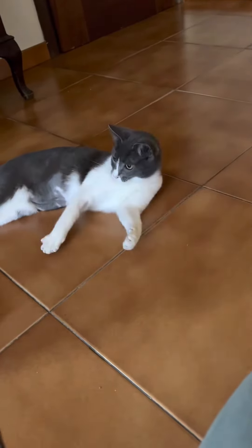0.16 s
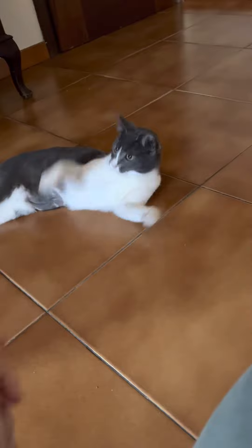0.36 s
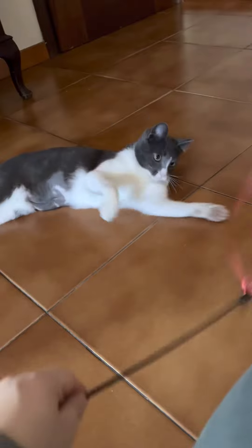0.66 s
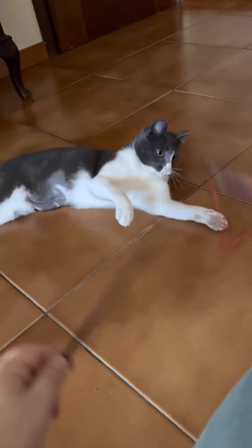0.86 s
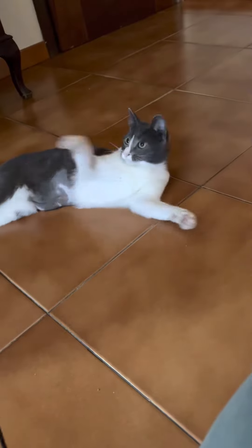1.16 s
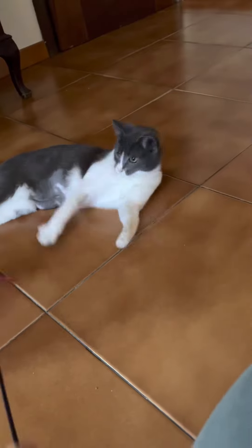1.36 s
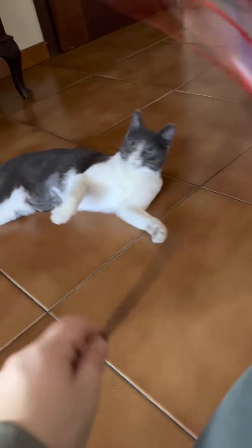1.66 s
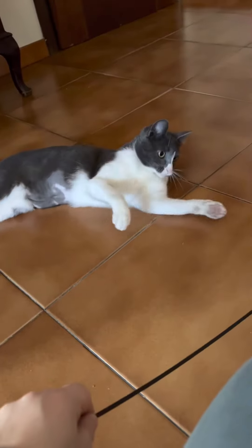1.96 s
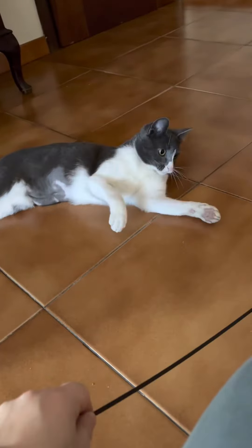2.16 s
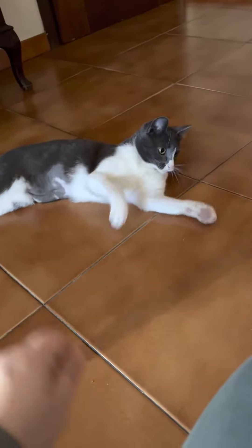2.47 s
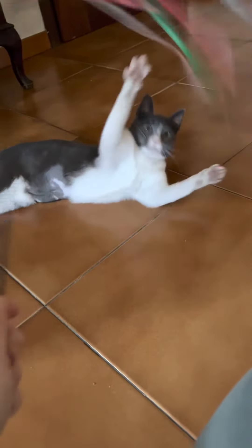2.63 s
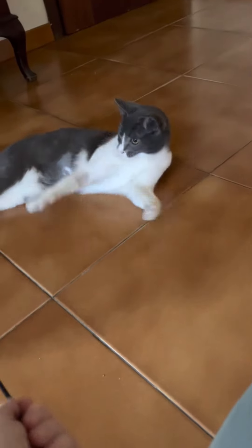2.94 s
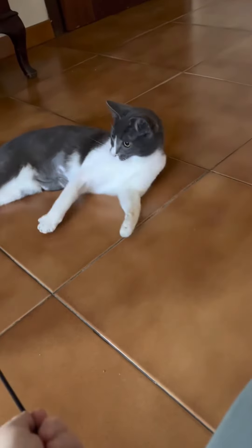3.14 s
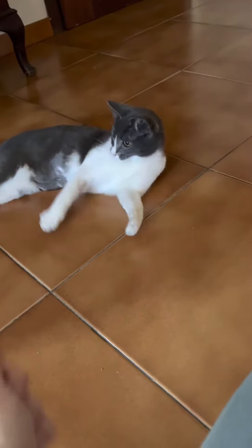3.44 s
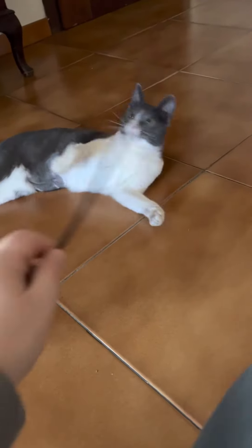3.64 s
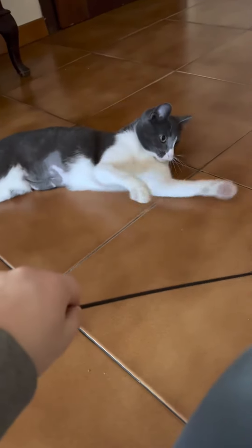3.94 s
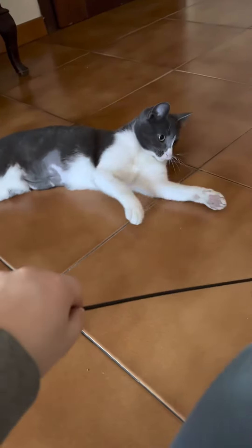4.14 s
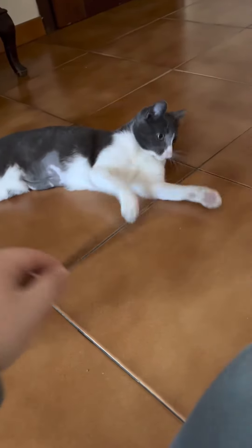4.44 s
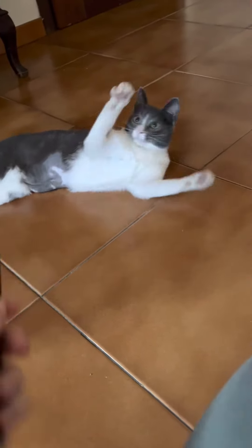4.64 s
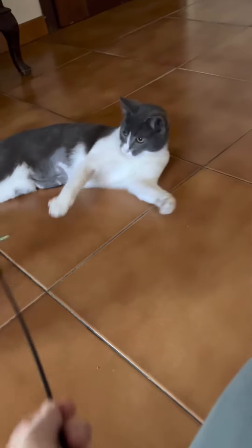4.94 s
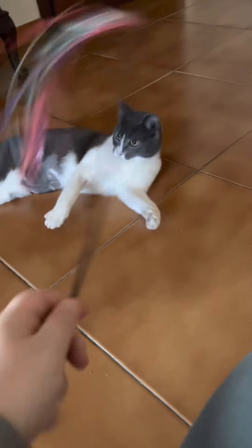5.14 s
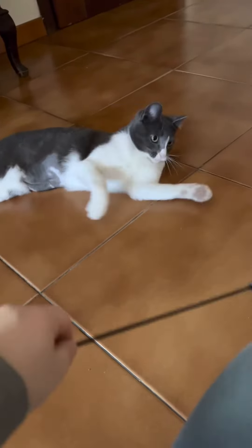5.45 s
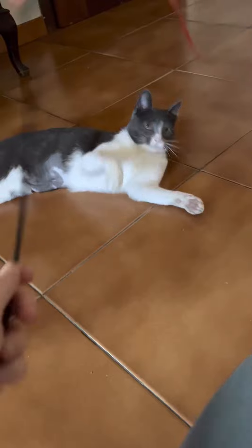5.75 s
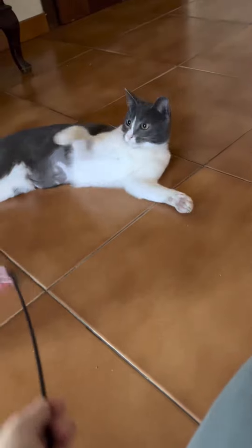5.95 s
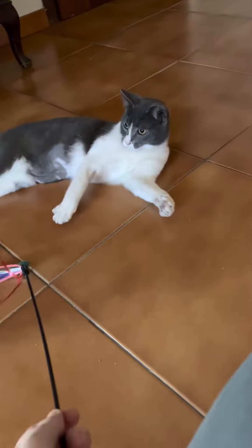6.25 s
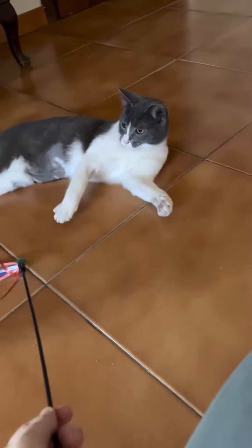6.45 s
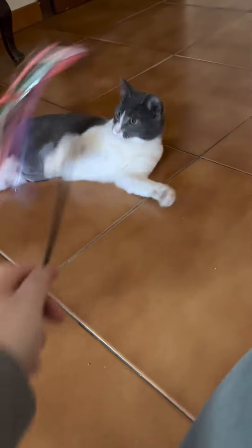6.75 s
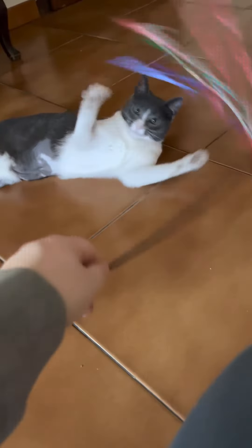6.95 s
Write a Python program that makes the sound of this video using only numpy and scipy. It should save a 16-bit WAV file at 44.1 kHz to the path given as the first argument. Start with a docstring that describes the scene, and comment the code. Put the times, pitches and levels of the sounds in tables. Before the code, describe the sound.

Faint bassy house hum runs throughout. Over it, thin foil strips swish and crackle in irregular bursts, first light, then hard cracks just after one second, a knock before two, more flurries around three and four, and the strongest slaps between five and six. A quiet gap follows, then a last swish and tap. Handheld phone close by, stereo, with slight low handling bumps and lively room echo.

```python
"""A house hums, drones and hisses faintly; then foil ribbons on a wand swish and crinkle, snap and slap on tiles.
Foil is dense random flips in two voices; snaps are short swelling ticks with a rattle; slaps are crinkle bursts.
The wand tip knocks: a falling sweep plus decaying modes. Sleeve brushes and low wand whooshes are band noise;
the hand bumps in low sines. Noise tails ring as a hard room; two close ports differ in phase and strength."""
import sys
import numpy as np
from scipy import signal
from scipy.fft import rfft, irfft, next_fast_len
from scipy.io import wavfile

SR = 44100
rng = np.random.default_rng(int(sys.argv[2]) if len(sys.argv) > 2 else 0)


def digitize_waveform(pressure):
    """Quantize a signal to 16-bit integers and store it at the path in sys.argv[1].

    Rows of a 2-D input are taken as channels; values are limited to [-1, 1].
    """
    field = np.atleast_2d(pressure).T
    bounded = np.clip(field, -1, 1)
    quanta = np.round(bounded * 32767).astype(np.int16)
    wavfile.write(sys.argv[1], SR, quanta)


N = 313110
SIZE = next_fast_len(N, True)


def undb(db):
    """Decibels to amplitude."""
    return 10 ** (np.asarray(db) / 20)


def level(x, db):
    """Scale to an RMS level."""
    return x * undb(db) / np.sqrt(np.mean(x ** 2))


def on_hz(table, size):
    """Read a (freq_hz, value) table at every transform bin, linear in log frequency."""
    hz, value = np.transpose(table)
    bins_hz = np.arange(size // 2 + 1) * SR / size
    return np.interp(np.log(bins_hz + 1), np.log(hz + 1), value)


def colour(x, table):
    """Filter by a (freq_hz, gain_db) table."""
    return irfft(rfft(x, SIZE) * undb(on_hz(table, SIZE)), SIZE)[..., :N]


def ring(x, hz, width_hz):
    """One resonance, gain 1 at its centre."""
    return signal.lfilter(*signal.iirpeak(hz, hz / width_hz, fs=SR), x)


def walk(rate_hz):
    """Random levels joined by straight lines; spread near 1."""
    knots = rng.standard_normal(int(N / SR * rate_hz) + 2)
    return 1.2 * np.interp(np.arange(N) * rate_hz / SR, np.arange(len(knots)), knots)


def pan(x, left_minus_right_db):
    """Split a level difference evenly over left and right."""
    return x * undb(np.array([left_minus_right_db / 2, -left_minus_right_db / 2]).reshape(2, -1))


# Left-right likeness of diffuse sound: freq_hz, correlation (no unit)
DIFFUSE_LIKENESS = [(100, .99), (300, .7), (700, .2), (1400, .1), (2000, .7), (2600, .35), (5500, .3),
                    (7200, .5), (7800, .98), (9000, .98), (10000, .5), (11300, .97), (12800, .97),
                    (13600, .5), (14500, .97)]


def spread(size):
    """Diffuse noise at two close ports: mid and side weighted to set the correlation."""
    mid, side = rfft(rng.standard_normal((2, size)))
    likeness = np.clip(on_hz(DIFFUSE_LIKENESS, size), 0, 1)
    signs = np.array([[1], [-1]])
    return irfft(np.sqrt((1 + likeness) / 2) * mid + np.sqrt((1 - likeness) / 2) * side * signs, size)


# Motor tones: pitch_hz, level_db
MOTOR_TONES = [(49.0, -42), (100.0, -55)]


def motor_hum():
    """Steady sine tones whose levels waver."""
    t = np.arange(N) / SR
    hum = 0
    for (hz, db), wobble_db in zip(MOTOR_TONES, (.8, 1.8)):
        hum = hum + np.sqrt(2) * undb(db + wobble_db * walk(9)) * np.sin(2 * np.pi * hz * t)
    return hum


# Room modes: centre_hz, width_hz (of each of two passes), level_db
DRONE_MODES = [(75, 29, -64), (144.3, 7.1, -60.5), (209.9, 7.5, -71), (259.7, 12, -70), (312, 64, -68.5)]


def drone():
    """Room modes: noise rung twice through each resonance, slowly wavering."""
    noise = spread(SIZE)[:, :N]
    out = 0
    for hz, width_hz, db in DRONE_MODES:
        mode = level(ring(ring(noise, hz, width_hz), hz, width_hz), db)
        out = out + mode * undb(2.0 * walk(3.3))
    return out


# Narrow house tone that comes and goes: time_s, level_db
WHINE_LEVELS = [(0, -55), (.15, -56.5), (.8, -58), (1.0, -57), (1.3, -52), (1.5, -61.5), (2.0, -56),
                (2.3, -68.5), (2.8, -52), (3.05, -64), (3.9, -67), (4.3, -65), (4.5, -60), (5.3, -65),
                (5.7, -60), (6.2, -55.5), (6.5, -60.5), (7.1, -62.5)]
WHINE_HZ, WHINE_DRIFT_HZ, WHINE_WOBBLE_DB = 180, 2.0, 1.5


def whine():
    """One sine with drifting pitch and uneven level."""
    pitch_hz = WHINE_HZ + WHINE_DRIFT_HZ * walk(8.9)
    tone = np.sqrt(2) * np.sin(2 * np.pi * np.cumsum(pitch_hz) / SR)
    path_db = np.interp(np.arange(N) / SR, *np.transpose(WHINE_LEVELS))
    return tone * undb(path_db + WHINE_WOBBLE_DB * walk(14))


# Hiss spectrum: freq_hz, relative_db (per Hz)
HISS_SPECTRUM = [(25, -33.5), (45, 11.5), (70, -2), (120, -5), (200, -11), (340, -28.5), (450, -27.5),
                 (1000, -32.5), (2500, -44.5), (6000, -48), (12000, -48.5), (15000, -52.5)]
HISS_DB = -52


def hiss():
    """Wide coloured noise, strongest in the bass, with a slow waver."""
    return level(colour(spread(SIZE), HISS_SPECTRUM), HISS_DB) * undb(0.81 * walk(1.3))


def house():
    """Motor tones, room modes, narrow tone and hiss add up."""
    return motor_hum() + drone() + whine() + hiss()


# Flutters of the bunch, in a swing or settling: loudest_s, rise_s, fall_s, crinkle_db, air_swish_db
FLUTTERS = [(.23, 0.092, 0.17, -62, -73), (.32, 0.14, 1, -60.5, -70.5), (.7, 0.17, 0.24, -64, -63),
            (.87, 0.25, 0.18, -52.5, -83), (1.145, 0.32, 0.13, -59.5, -73), (1.29, .05, 0.28, -52.5, -77),
            (1.445, 0.1, 0.098, -49.5, -61.5), (1.68, 0.065, 0.044, -57, -97),
            (1.82, 0.06, 0.15, -46.5, -47), (2.03, 0.073, 0.075, -59, -66),
            (2.509, 0.088, 0.14, -49.5, -58.5), (2.719, 0.23, 0.079, -58, -66),
            (2.93, 0.074, 0.077, -47.5, -83), (3.1, 0.24, 0.061, -65.5, -95),
            (3.46, 0.14, 0.13, -48.5, -71), (3.63, 0.15, 0.092, -56.5, -64.5),
            (3.79, 0.076, 0.28, -58.5, -59.5), (4.04, 0.07, 0.084, -58, -87.5),
            (4.45, 0.08, 0.27, -57, -64.5), (4.67, 0.09, 0.18, -58.5, -69.5),
            (4.882, 0.056, 0.099, -41, -53.5), (5.06, 0.22, 0.16, -57, -84),
            (5.27, 0.048, 0.15, -54.5, -67), (5.372, 0.0069, 0.025, -47.5, -62),
            (5.42, 0.066, 0.24, -44, -49), (5.57, .07, 0.11, -52.5, -61), (5.799, 0.054, 0.11, -51.5, -65),
            (6.01, 0.099, 0.13, -45, -54.5), (6.245, .06, 0.14, -66, -81), (6.502, 0.041, 0.11, -73, -64.5),
            (6.63, 0.13, 0.22, -60, -66.5), (6.86, 0.046, 0.044, -69, -73.5),
            (6.95, 0.036, .04, -67.5, -89), (7.07, 0.084, 0.052, -51.5, -45.5)]
EDGE_DB, AIR_EDGE_DB, EDGE_POWER = 17.5, 25.5, 1.34  # drop one rise or fall from the top; its shape


def flutter():
    """Gains of crinkle and air: each flutter swells to its top and settles; powers add."""
    t, power = np.arange(0, N + 64, 64) / SR, 0
    for s, rise_s, fall_s, crinkle_db, air_db in FLUTTERS:
        away = np.where(t < s, (s - t) / rise_s, (t - s) / fall_s) ** EDGE_POWER
        power = power + undb([crinkle_db - EDGE_DB * away, air_db - AIR_EDGE_DB * away]) ** 2
    return [np.interp(np.arange(N) / SR, t, gain) for gain in np.sqrt(power)]


# Lower and upper foil voices: freq_hz, relative_db (per Hz)
FOIL_LOW_SPECTRUM = [(300, -24), (1200, -11.5), (2500, -5), (4500, -6), (7000, -0.5), (8000, -3.5),
                     (9000, -40.5)]
FOIL_HIGH_SPECTRUM = [(7000, -42.5), (8000, -8), (9500, 1.5), (12500, -6), (14300, -1.5), (15700, -23),
                      (16500, -28)]


def creases(rate_hz, scatter_db):
    """Dense small flips of uneven size, coloured as lower and upper foil voice."""
    size_db = np.minimum(scatter_db * rng.exponential(size=N), 9)
    flips = (rng.random(N) < rate_hz / SR) * rng.standard_normal(N) * undb(size_db)
    voices = np.array([colour(flips, FOIL_LOW_SPECTRUM), colour(flips, FOIL_HIGH_SPECTRUM)])
    return voices / np.std(voices.sum(axis=0))


# Bands of the crinkle that rise and fall independently: centre_hz, width_hz
CRINKLE_BANDS = [(1700, 900), (2700, 170), (4000, 750), (5700, 2700), (11000, 14000)]
BAND_SWING_DB = 3.5


def foil(crinkle, swish):
    """Small creases flip in clusters of shifting colour; air hisses past the strips."""
    clusters_db = 2.2 * walk(25) + 2.4 * walk(90)
    flips = creases(7000, 3.3).sum(axis=0)
    shifts = 0
    for hz, width_hz in CRINKLE_BANDS:
        shifts = shifts + (undb(BAND_SWING_DB * walk(22)) - 1) * ring(flips, hz, width_hz)
    flips = level(flips + shifts, 0)
    air = level(ring(rng.standard_normal(N), 860, 1300), 0)
    return flips * crinkle * undb(clusters_db) + air * swish


SMALL_PER_S, SMALL_HZ, SMALL_PAN_DB = 30, 4600, 3
SMALL_OVER_DB, SMALL_SCATTER_DB = -1, 2  # relative to the crinkle gain of the moment


def small_cracks(crinkle):
    """Chance snaps as strong as the foil is busy: time_s, level_db, centre_hz, left_minus_right_db."""
    count = int(SMALL_PER_S * N / SR)
    s = .01 + rng.random(count) * (N / SR - .02)
    size, pitch, side = rng.standard_normal((count, 3)).T
    busy_db = 20 * np.log10(crinkle[(s * SR).astype(int)] + 1e-9)
    db = busy_db + SMALL_OVER_DB + SMALL_SCATTER_DB * size
    return list(zip(s, db, SMALL_HZ * np.exp(.2 * pitch), SMALL_PAN_DB * side))


LEAD, SPAN = 40, 800  # samples before the envelope peak, and in all


def tick(hz, cycles, turn):
    """A crease flips: a sine swells over some cycles and dies; envelope peak 1 at LEAD."""
    t = np.maximum((np.arange(SPAN) - LEAD) * hz / (SR * cycles) + 1, 0)
    return np.e * t * np.exp(-t) * np.sin(2 * np.pi * (t * cycles + turn))


# Single snaps, loud and faint: time_s, level_db, centre_hz, left_minus_right_db (core only)
SINGLE_SNAPS = [(.2604, -37, 5540, -3), (.334, -39.5, 3050, -1), (.343, -45, 4500, -2),
                (.411, -56, 4440, -6), (.5, -45, 5260, 3), (.6125, -42, 5330, -9), (.619, -36, 5070, 1),
                (.6395, -21, 4970, -1), (.664, -35, 3930, -5), (.791, -48, 5500, 1), (.823, -44, 5000, 0),
                (.851, -47, 5000, 0), (1.0531, -48, 5500, -4), (1.196, -19.5, 3520, -1.5),
                (1.2, -43, 4590, 1), (1.2228, -24, 3060, -7), (1.2259, -4.5, 4980, -1.5),
                (1.2313, -42, 4020, -2), (1.2352, -18, 6500, -11), (1.2382, -37, 5670, 11),
                (1.2646, -40, 5300, -2), (1.398, -35.5, 3870, 0), (1.444, -35, 4330, 5),
                (1.5028, -47, 3360, -2), (1.5787, -44, 5800, -3), (1.6118, -51.5, 5000, 1),
                (1.7021, -44, 5000, -4), (1.7094, -49, 4100, 10), (1.7698, -28, 5100, -12),
                (1.7723, -11, 8100, 6), (1.7872, -25.5, 2220, -2), (1.8096, -19, 4700, -4),
                (1.8276, -27, 7000, 0), (1.8786, -29, 5970, -4), (2.4128, -50.5, 9000, -4),
                (2.4968, -48, 5630, -3), (2.5217, -30.5, 3370, 4), (2.5313, -32.5, 5160, -5),
                (2.6185, -54, 5470, -3), (2.68, -52, 5500, -8), (2.8285, -24, 4000, 4),
                (2.8541, -16.5, 4880, 1.5), (2.8556, -26, 4960, 1), (2.860, -42, 4500, 8),
                (2.8672, -40, 6540, 10), (2.9251, -32.5, 3760, 3), (2.933, -35, 5000, -2.5),
                (2.939, -36, 3000, -2), (3.201, -42, 5040, 8), (3.4525, -32.5, 4130, 1),
                (3.396, -45, 3550, 1), (3.6142, -47, 4970, -2), (3.63, -56, 6100, 6),
                (3.6512, -56, 5000, -6), (3.6621, -45.5, 4530, -14), (3.741, -34.5, 6750, 4),
                (3.7445, -40, 5530, 0), (3.7699, -26.5, 6500, 5), (3.8263, -25, 8000, -9),
                (3.8461, -22, 7020, -8), (4.2135, -64.5, 7000, -1), (4.5484, -44.5, 3460, -0.5),
                (4.587, -48.5, 4940, 0), (4.651, -55, 5000, -7), (4.661, -49, 4500, 3),
                (4.708, -44, 3430, 5), (4.716, -47, 5800, -11), (4.8232, -30, 3360, -3),
                (4.827, -38, 4000, 0), (4.8335, -20.5, 4050, 5), (4.8393, -27, 6130, -13),
                (4.8875, -27, 7000, -4), (4.89, -30.5, 5000, 0), (4.901, -28, 4470, 0),
                (5.0016, -38, 6000, 0), (5.0057, -35, 4180, -6), (5.071, -40, 4000, -1),
                (5.101, -40, 4430, -3), (5.2412, -42.5, 6900, -4), (5.2585, -33.5, 6900, -7),
                (5.324, -54, 5000, 3), (5.3788, -26, 6290, 0), (5.3815, -29, 2210, 11),
                (5.385, -12.5, 4170, 2), (5.3887, -16, 2500, -9), (5.5015, -20.5, 4100, -3),
                (5.6474, -35.5, 5800, -1), (5.778, -42.5, 3600, -2), (5.8073, -35, 4320, -6),
                (5.9261, -57.5, 5800, 11), (5.9518, -6, 4260, 6), (5.9565, -20, 4600, 0.5),
                (5.9578, -15, 4570, -1), (5.9592, -16, 4270, 0.5), (5.9651, -29, 4800, 5),
                (6.0391, -22, 6430, 3), (6.058, -28.5, 3880, 0), (6.2737, -64.5, 4380, 0.5),
                (6.7186, -48, 3540, -4.5), (6.855, -57.5, 3680, 3.5), (7.0171, -29, 2180, -7),
                (7.0464, -33, 4500, 7), (7.0585, -16, 6940, -3.5)]
# base values hold for a -30 dB snap (dull edge: also 4 kHz); slopes are per dB of snap level
SNAP_CYCLES, SNAP_CYCLES_PER_DB = .42, .008  # envelope swell, never under 0.2 cycles
DULL_DB, DULL_DB_PER_OCTAVE, DULL_DB_PER_DB = -14.5, -9.5, -0.0421
BRIGHT_DB, BRIGHT_DB_PER_DB = -6.5, -0.2623
# neighbouring creases: some give way just before the main one, more follow
RATTLE_DB, RATTLE_DB_PER_DB, RATTLE_Q = -6, -0.2934, 1.2
RATTLE_RISE_S, RATTLE_S = 0.0003, 0.0013
CORE_CUT_HZ = 900  # the core carries no bass below this


def snaps(rows):
    """Each crease: a ringing, rattling core with a duller and a brighter edge."""
    out = np.zeros((2, N + SPAN))
    after_s = (np.arange(SPAN) - LEAD) / SR
    fade = np.exp(np.where(after_s > 0, -after_s / RATTLE_S, after_s / RATTLE_RISE_S))
    core_cut = signal.butter(2, CORE_CUT_HZ, "high", fs=SR)
    turns = rng.random((len(rows), 4))
    grits = rng.standard_normal((len(rows), SPAN))
    for (s, db, hz, pan_db), turn, grit in zip(rows, turns, grits):
        over_db = db + 30
        dull_db = DULL_DB + DULL_DB_PER_OCTAVE * np.log2(hz / 4000) + DULL_DB_PER_DB * over_db
        bright_db = BRIGHT_DB + BRIGHT_DB_PER_DB * over_db
        cycles = max(SNAP_CYCLES + SNAP_CYCLES_PER_DB * over_db, .2)
        strip_ring = undb(-22) * tick(0.69 * hz, 2.2, turn[3])
        rattle = fade * level(ring(grit, hz, hz / RATTLE_Q), RATTLE_DB + RATTLE_DB_PER_DB * over_db)
        core = signal.lfilter(*core_cut, tick(hz, cycles, turn[0]) + strip_ring + rattle)
        dull = undb(dull_db) * tick(1000, 0.17, turn[1])
        bright = undb(bright_db) * tick(11000, 1.4, turn[2])
        i = int(s * SR) - LEAD
        out[:, i:i + SPAN] += undb(db) * (pan(core, pan_db) + dull + bright)
    return out[:, :N]


# The bunch lands or whips round: time_s, level_db, t60_s, treble_db, body_db (last two relative)
SLAPS = [(0.32, -41.5, .075, -3, 4), (.635, -27, 0.11, 2.5, 2), (1.07, -40.5, .071, -1, -2),
         (1.194, -34, 0.14, 0.5, -2.5), (1.229, -36, .12, 8.5, -3.5), (1.768, -37, .34, 2, 1.5),
         (2.413, -65, 0.48, 8.5, -2), (2.513, -38, 0.044, -1.5, 2), (2.755, -39, 0.045, -3, -6),
         (2.826, -30, 0.028, -2, 7), (2.855, -44.5, 0.12, 10, -8), (3.198, -42.5, 0.023, 1.5, -12.5),
         (3.738, -37.5, .027, -10, 7.5), (3.816, -44, 0.35, 4, 0), (4.824, -50, .051, -3, 0),
         (5.241, -56, .11, 3, -4.5), (5.379, -18.5, 0.061, -6.5, 2.5), (5.778, -66, 0.06, -2.5, 1.5),
         (5.953, -15, 0.034, 2.5, -2), (6.852, -65.5, .034, -2.5, -6.5), (7.01, -40, 0.097, 5, -2),
         (7.057, -54, 0.059, 18, 0)]
SLAP_ATTACK_S = 0.005
SLAP_BODY_HZ, SLAP_BODY_WIDTH_HZ = 1123, 850


def slaps():
    """Many strips crumple at once, then settle; a low-mid resonance gives body."""
    gains = np.zeros((3, N + SR // 2))  # low, treble, body
    t = np.arange(SR // 2) / SR
    attack = np.minimum(t / SLAP_ATTACK_S, 1)
    for s, db, t60_s, treble_db, body_db in SLAPS:
        i = int(s * SR)
        decay = undb(db - 60 * t / t60_s)
        gains[:, i:i + len(t)] += decay * undb([[0], [treble_db], [body_db]]) * attack
    low, high = creases(8000, 2.5) * undb(2.2 * walk(200))
    body = ring(low * gains[2, :N], SLAP_BODY_HZ, SLAP_BODY_WIDTH_HZ)
    return low * gains[0, :N] + high * gains[1, :N] + body


# Wand tip on the tiles: time_s, level_db
KNOCKS = [(0.639, -39.5), (1.2253, -44.5), (1.7868, -20.5), (2.854, -43), (3.455, -44.5), (5.381, -22.5),
          (5.952, -38), (7.0174, -23.5)]
# Modes of wand and floor: pitch_hz
KNOCK_PITCHES = [95, 215, 263, 325, 402, 520, 628, 905, 1276]
# The same modes: relative_db, t60_s
KNOCK_DECAYS = [(-9, 0.14), (7.5, 0.097), (8.5, 0.048), (-5, 0.031), (-5, 0.073), (-5, 0.14), (-6, 0.0076),
                (-3.5, 0.051), (-8, 0.1)]
KNOCK_SWELL_S = 0.0033  # the ring builds up after the blow


def knocks():
    """The blow runs down the wand as a bending wave, highs first; wand and floor ring briefly."""
    t = np.arange(SR // 4) / SR
    sweep_hz = 200 + 2200 * np.exp(-t / 0.001235)
    bend = np.sin(2 * np.pi * np.cumsum(sweep_hz) / SR) * np.exp(-t / 0.0087)
    body = 0
    for hz, (db, t60_s) in zip(KNOCK_PITCHES, KNOCK_DECAYS):
        body = body + undb(db - 60 * t / t60_s) * np.sin(2 * np.pi * hz * t)
    body = undb(-9.5) * body * np.minimum(t / KNOCK_SWELL_S, 1)
    blows = np.zeros(N)
    for s, db in KNOCKS:
        blows[int(s * SR)] = undb(db)
    return signal.fftconvolve(blows, bend + body)[:N]


# Bumps of the hand that holds the phone: time_s, pitch_hz, level_db
HAND_BUMPS = [(0.661, 75, -38), (2.875, 68.4, -35), (3.55, 71, -32.5), (3.639, 60, -33), (4.641, 75, -34),
              (4.682, 71, -35), (5.958, 68, -36)]


def bumps():
    """Low sines that die within a few cycles."""
    out, t = np.zeros(N), np.arange(SR // 5) / SR
    for s, hz, db in HAND_BUMPS:
        i = int(s * SR)
        out[i:i + len(t)] += undb(db) * np.sin(2 * np.pi * hz * t) * np.exp(-t / 0.016)
    return out


# Soft brushes of sleeve and low whooshes of the wand:
# start_s, end_s, centre_hz, width_hz (of each of two passes), level_db
BRUSHES_AND_WHOOSHES = [(1.66, 1.765, 700, 400, -73), (4.24, 4.618, 2036, 1010, -70),
                        (3.274, 3.4, 9000, 7000, -69.5), (4.34, 4.712, 314, 195.4, -62.5),
                        (6.313, 6.736, 1834, 1480, -70), (6.326, 6.762, 311, 198, -63)]


def brushes_and_whooshes():
    """Band noise that swells and fades unevenly."""
    out, t = np.zeros(N), np.arange(N) / SR
    for start_s, end_s, hz, width_hz, db in BRUSHES_AND_WHOOSHES:
        swell = np.sin(np.pi * np.clip((t - start_s) / (end_s - start_s), 0, 1)) ** 0.4
        band_noise = ring(ring(rng.standard_normal(N), hz, width_hz), hz, width_hz)
        out += swell * level(band_noise, db) * undb(0.74 * walk(40))
    return out


# Decay of the hard room: freq_hz, t60_s
ROOM_DECAY = [(200, 0.62), (500, 0.44), (1400, 0.4), (3700, 0.39), (9700, 0.24), (15000, 0.15)]
ROOM_DB = -3.5  # tail energy per channel, relative to the direct sound's unit impulse


def room(x):
    """Hard walls and tiles return a dense noise tail; the treble dies first."""
    size = SR // 2
    t, tail = np.arange(size) / SR, 0
    noise, hz = rfft(spread(size)), np.transpose(ROOM_DECAY)[0]
    for k, (_, t60_s) in enumerate(ROOM_DECAY):
        share = on_hz(np.transpose([hz, np.arange(len(hz)) == k]), size)  # overlapping bands
        tail = tail + irfft(noise * share, size) * undb(-60 * t / t60_s)
    tail *= np.clip(t / 0.0011, 0, 1)  # onset ramp, s
    tail *= undb(ROOM_DB) / np.sqrt(np.sum(tail ** 2) / 2)
    return signal.fftconvolve(x.mean(axis=0, keepdims=True), tail, axes=1)[:, :N]


def scene():
    """Two groups of toy sounds, each with its own room tail, over house and hand."""
    crinkle, swish = flutter()
    rows = SINGLE_SNAPS + small_cracks(crinkle)
    # snaps alternate between two room tails, so the ringing colour varies
    foil_part = foil(crinkle, swish) + slaps() + snaps(rows[::2])
    knock_part = knocks() + snaps(rows[1::2])
    toy = sum(part + room(part) for part in (foil_part, knock_part))
    return toy + house() + bumps() + brushes_and_whooshes()


# Phase between the ports: freq_hz, left_lead_rad
PORT_PHASE = [(300, 0), (700, 1.4), (1800, .1), (3000, .6), (5000, 0), (7700, -2.8), (8400, -3.14),
              (9300, -3.6), (11200, -6.1), (12900, -6.4), (14200, -9.1), (16000, -9.45)]
# Strength between the ports: freq_hz, left_minus_right_db
PORT_BALANCE = [(60, -1.5), (150, -2), (400, -5.5), (800, 6), (1400, -1.5), (1900, 0.5), (4200, 6.5),
                (7500, 0)]
BASS_CUT_HZ, TOP_HZ = 32, 16600


def record(dry):
    """Two ports hear each pitch at a different phase and strength; deepest bass and top are cut."""
    half = np.array([[.5], [-.5]])
    gain = undb(half * on_hz(PORT_BALANCE, SIZE))
    phase = np.exp(1j * half * on_hz(PORT_PHASE, SIZE))
    heard = irfft(rfft(dry, SIZE) * gain * phase, SIZE)[:, :N]
    heard = signal.sosfilt(signal.butter(2, BASS_CUT_HZ, "high", fs=SR, output="sos"), heard)
    return signal.sosfilt(signal.ellip(8, .2, 70, TOP_HZ, fs=SR, output="sos"), heard)


dry = scene()
out = record(dry)
digitize_waveform(out)
```